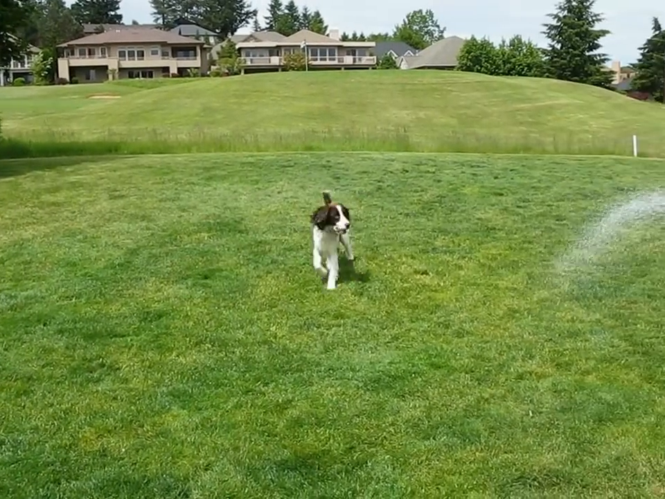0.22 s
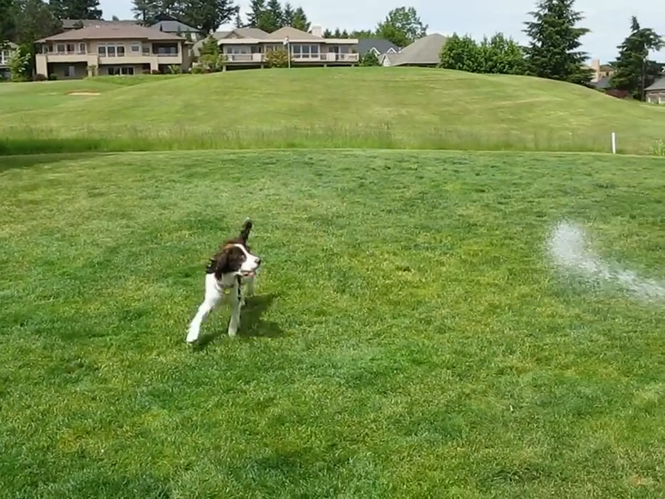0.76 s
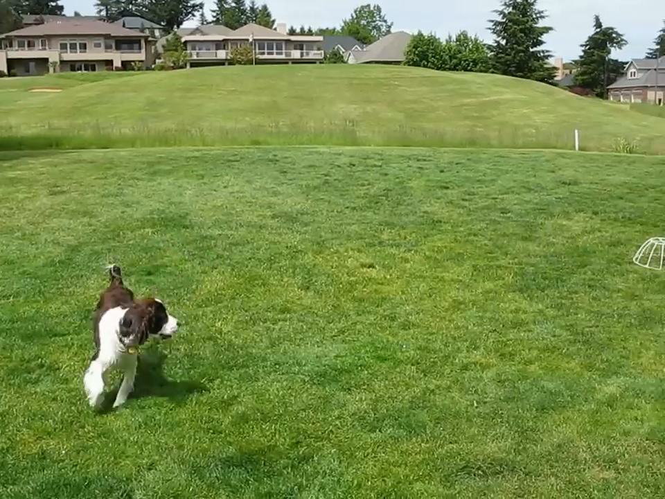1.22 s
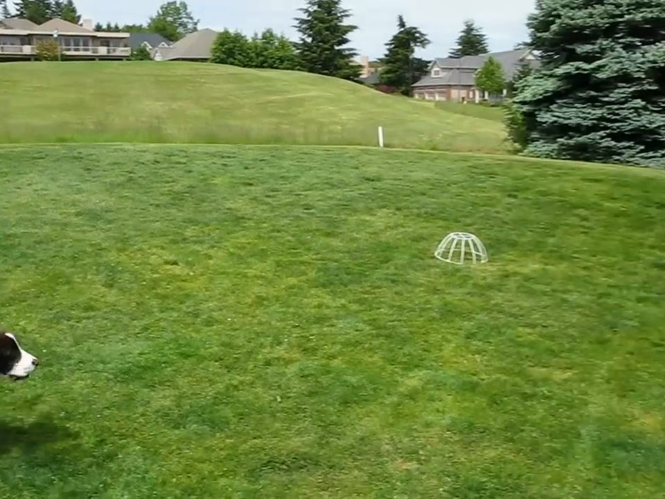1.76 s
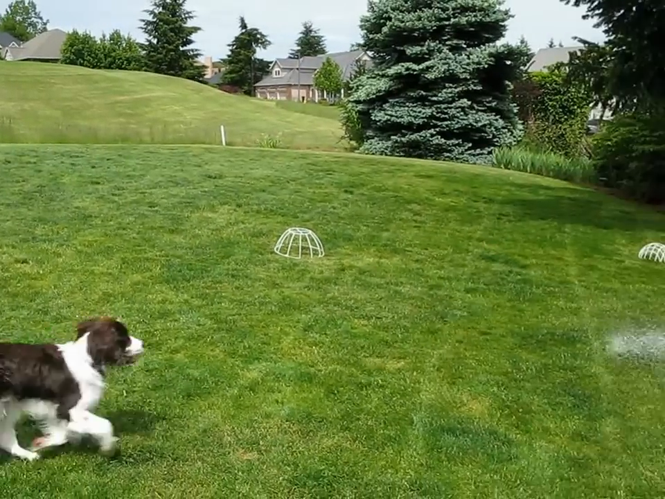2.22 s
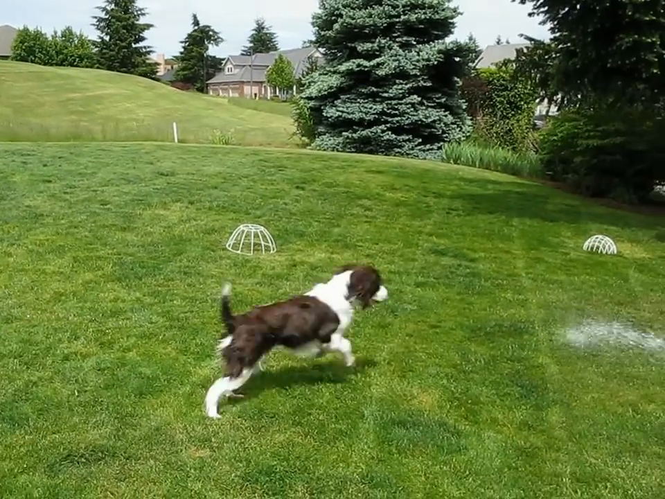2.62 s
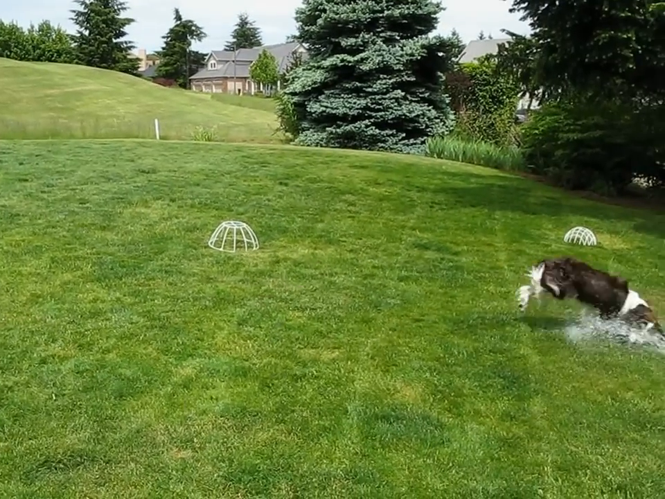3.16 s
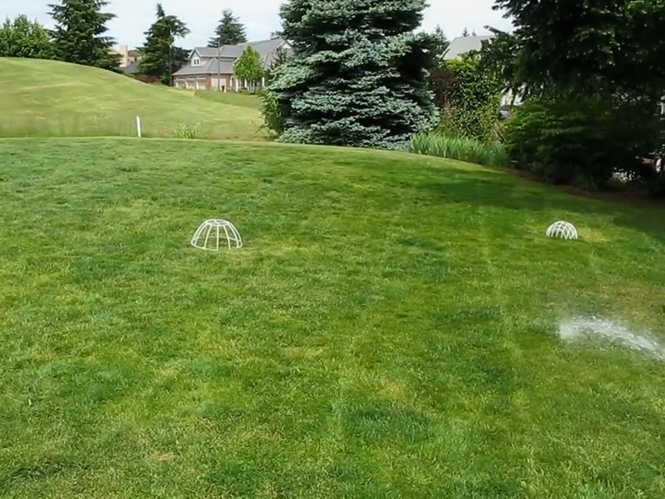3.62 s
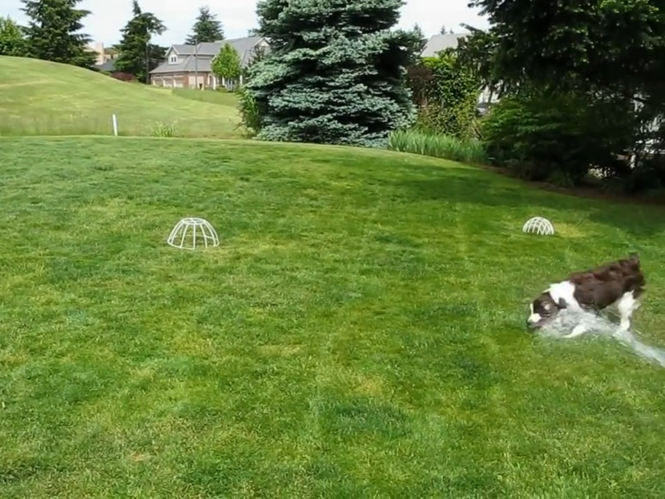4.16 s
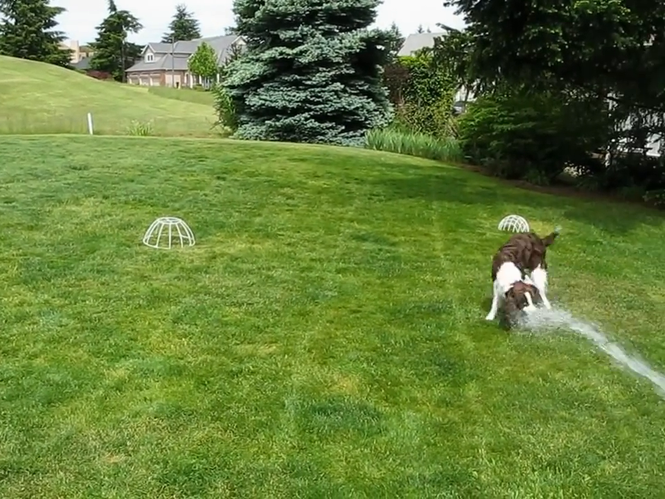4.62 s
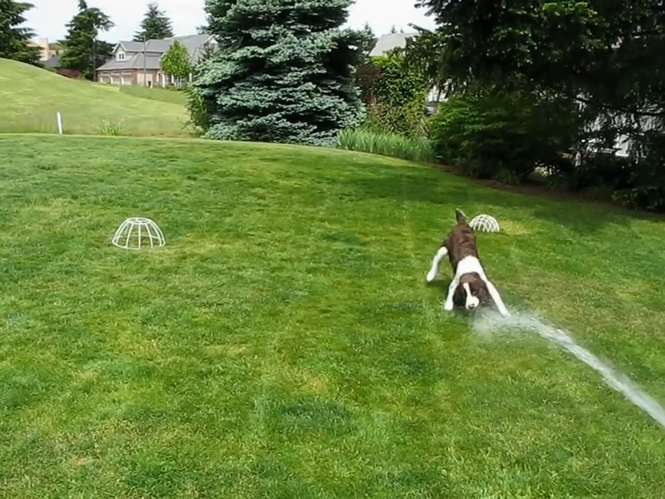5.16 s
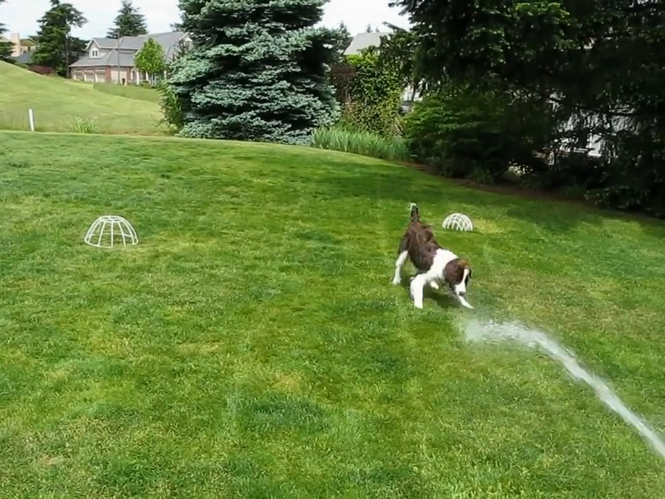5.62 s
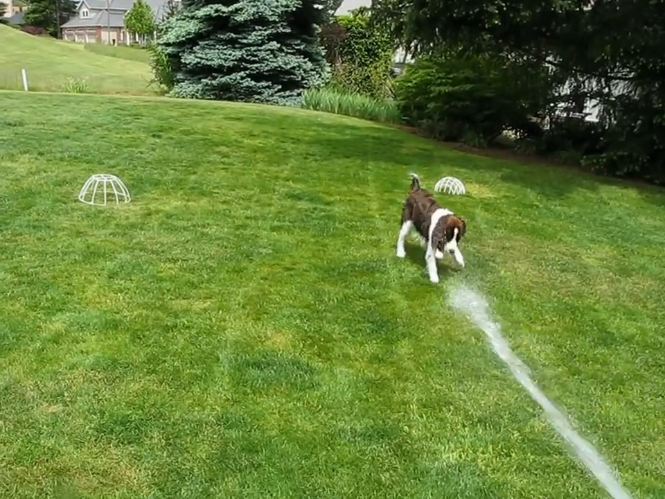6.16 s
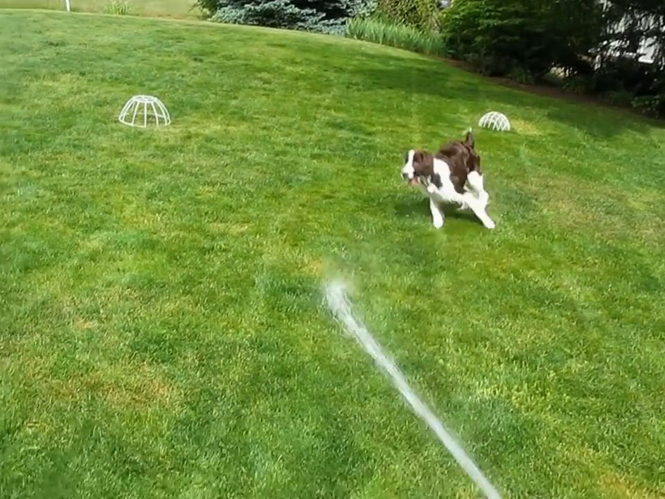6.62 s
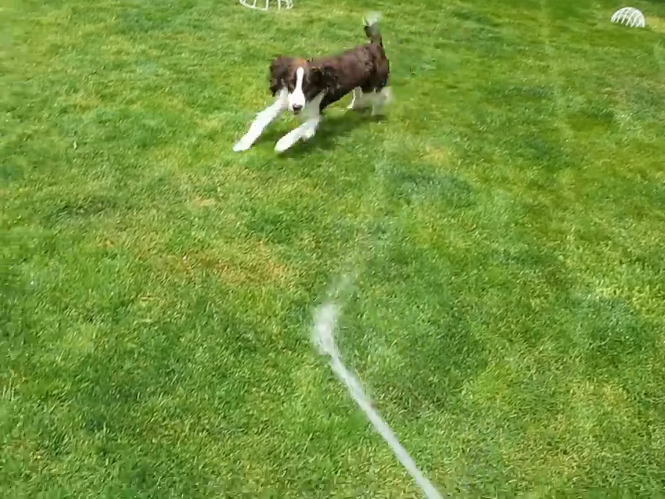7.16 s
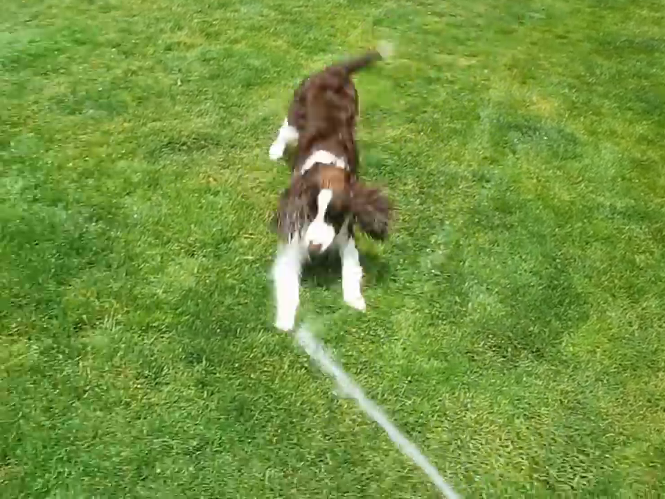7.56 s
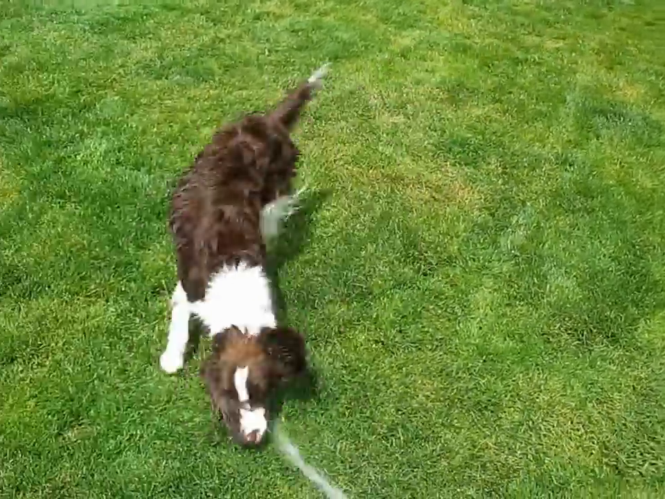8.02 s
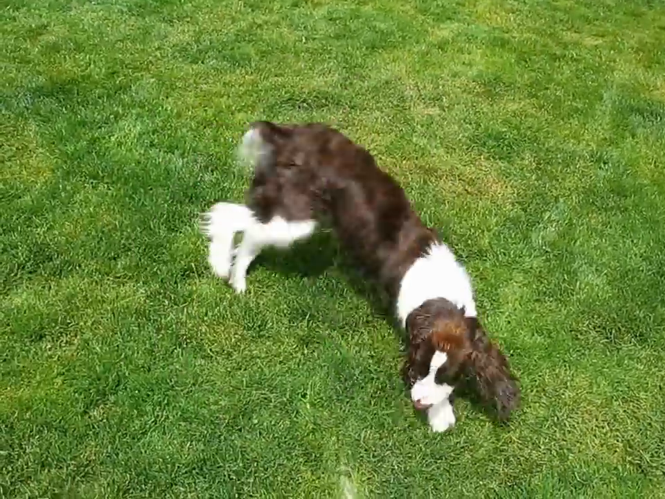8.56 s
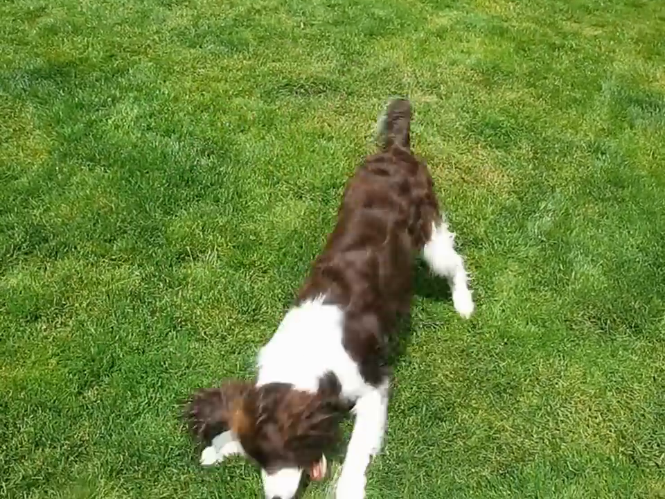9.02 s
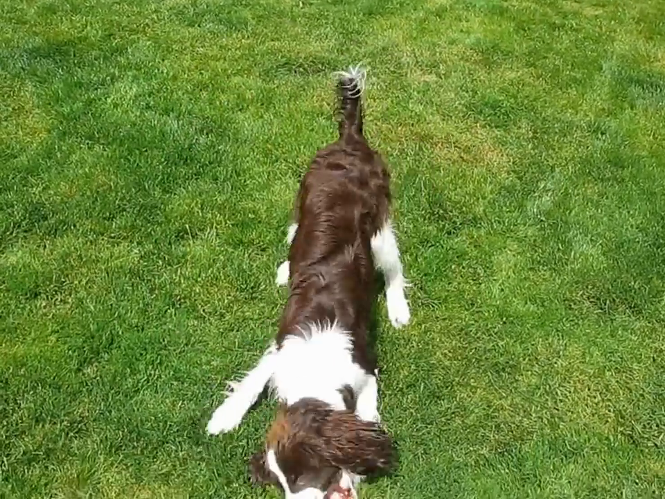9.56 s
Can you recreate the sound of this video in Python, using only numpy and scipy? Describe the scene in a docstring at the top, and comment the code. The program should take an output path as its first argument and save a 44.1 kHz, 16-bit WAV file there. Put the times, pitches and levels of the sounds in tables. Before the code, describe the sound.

Outdoors in a garden, a hose jet hisses close to the microphone, its colour shifting as the nozzle swings round. Spent water patters softly on grass over faint neighbourhood air and a distant engine hum. After about seven seconds the stream hits a dog: the smooth hiss gives way to crackling splatter, fat drops, wet slaps and mouthy gurgles until the end.

```python
"""A garden hose jet hisses over a lawn, close to the microphone, while a dog chases the spray.
The hiss is droplet patter, recoloured as the nozzle comes round from the side towards straight ahead.
Near the end the jet splatters on the dog's muzzle in clumps of drops and gurgles through mouth resonances.
Spent water patters softly on the grass; far off an engine hums in three wavering sine lines.
Low neighbourhood air and a light breeze on the microphone are shaped noise."""
import sys
import numpy as np
from scipy import signal
from scipy.fft import rfft, irfft, next_fast_len
from scipy.io import wavfile
from scipy.ndimage import uniform_filter1d, map_coordinates

SR = 44100
rng = np.random.default_rng(int(sys.argv[2]) if len(sys.argv) > 2 else 0)


def put_to_file(sound):
    """Save the sound as 16-bit audio at rate SR, in the file named by the first command-line argument."""
    columns = np.atleast_2d(sound).T  # one column per channel
    safe = np.clip(columns, -1, 1)
    whole_steps = np.round(safe * 32767)
    wavfile.write(sys.argv[1], SR, whole_steps.astype(np.int16))


N = 432180  # samples, 9.8 s


def amp(db):
    """Decibels to a linear gain."""
    return 10 ** (np.asarray(db) / 20)


def unit(x):
    """x at rms 1."""
    return x / np.sqrt(np.mean(x ** 2) + 1e-20)


def along(points, hz):
    """Interpolate (frequency [Hz], value) points on a log frequency axis."""
    f, v = np.transpose(points)
    return np.interp(np.log(hz + 1), np.log(f + 1), v)


def curve(rows, t):
    """Interpolate (time [s], value) rows at times t."""
    times, values = np.transpose(rows)
    return np.interp(t, times, values)


def wobble(rate):
    """A smooth random curve, rate knots a second."""
    knots = rng.standard_normal(int(N * rate / SR) + 4)
    return map_coordinates(knots, [np.arange(N) * rate / SR])


def swell(t, middle, length):
    """A rounded hump of height 1, at half height over the given length."""
    return .5 ** (np.abs(2 * (t - middle) / length) ** 3)


def swelling(rest_db, rows):
    """A gain that rests at one level and rises in (middle [s], length [s], level [dB]) swells."""
    t = np.arange(N) / SR
    power = sum((amp(db) * swell(t, middle, length)) ** 2 for middle, length, db in rows)
    return np.sqrt(amp(rest_db) ** 2 + power)


def filtered(x, response):
    """x times a complex response of frequency."""
    m = next_fast_len(N + SR // 2)
    return irfft(rfft(x, m) * response(np.fft.rfftfreq(m, 1 / SR)), m)[:N]


def coloured(x, spectrum):
    """x shaped by (frequency [Hz], relative level [dB]) points, at rms 1."""
    return unit(filtered(x, lambda hz: amp(along(spectrum, hz))))


def resonant(x, modes):
    """x through (frequency [Hz], width [Hz], relative level [dB]) resonances of alternating sign, at rms 1."""
    def response(f):
        total = 0
        for k, (centre, width, db) in enumerate(modes):
            damping = 1j * f * width
            total = total + (-1) ** k * amp(db) * damping / (centre * centre - f * f + damping)
        return total
    return unit(filtered(x, response))


def bell(hz, centre_hz, width):
    """A smooth bump of height 1."""
    return 1 / (1 + .5 * ((hz - centre_hz) / width) ** 2) ** 2


def patter(rate, spread_db, share):
    """Droplet impacts of scattered size, carrying a share of the power, on smooth noise."""
    landing = rng.random(N) < rate / SR
    size = amp(spread_db * np.clip(rng.standard_normal(N), -2, 2))
    hits = landing * rng.choice([-1, 1], N) * size
    share = np.clip(share, 0, 1)
    return np.sqrt(share) * unit(hits) + np.sqrt(1 - share) * rng.standard_normal(N)


def bubbles(rate, pitch_hz, spread, cycles):
    """Small air pockets ring briefly with rising pitch, at rms 1 overall."""
    count = int(rate * N / SR)
    start = rng.integers(0, N, count)[:, None]
    pitch, size = rng.standard_normal((2, count, 1))
    n = np.arange(SR // 60)
    turns = pitch_hz * np.exp(spread * pitch) * n / SR
    decay = amp(4 * np.clip(size, -2, 2) - 60 * turns / cycles)
    ring = decay * np.sin(2 * np.pi * turns * (1 + .1 * turns / cycles))
    return unit(np.bincount((start + n).ravel(), ring.ravel(), N)[:N])


def patches(shape, size):
    """A random time-frequency field of rms 1, smooth over size = (bins, frames)."""
    field = rng.standard_normal(shape)
    for axis in (0, 1, 0, 1):
        field = uniform_filter1d(field, size[axis], axis)
    return unit(field)


# low air of the neighbourhood: (frequency [Hz], relative level [dB])
AIR_SPECTRUM = [(20, -14), (40, -11), (55, -1), (68, -4), (110, -2), (170, -3), (300, -9), (500, -18),
                (1500, -40), (8000, -90)]
# far engine: (line [Hz], resting level before its flutter [dB])
ENGINE_LINES = [(97.2, -57), (128.5, -57), (243, -60)]
# one line of the hum swells and fades: (middle [s], length [s], line [Hz], level before flutter [dB])
ENGINE_SWELLS = [(0.035, 1.07, 128.5, -53), (.85, 0.72, 243, -47), (2.3, 1.6, 97.2, -51),
                 (2.9, 0.99, 128.5, -51.5), (3.85, 0.32, 243, -52), (5, .5, 97.2, -52),
                 (5.5, .7, 128.5, -57), (6.7, 1.1, 128.5, -51.5), (6.702, 1, 97.2, -60)]
AIR_DB, AIR_DB_PER_S = -51, -0.48  # level at the start, slow change
BREEZE_DB, PUFF_S, PUFF_LENGTH_S, PUFF_DB = -68, 1.76, .17, -49  # steady level; one puff: middle, length, level
LULL_S, LULL_LENGTH_S = 8.63, 1.1  # everything in the background sinks once: middle, length
LULL_DB, AIR_LULL_DB = -12, -0.5  # change of hum and breeze, change of the air


def outdoors():
    """Low neighbourhood air, a far engine's wavering lines and breeze on the microphone."""
    t = np.arange(N) / SR
    lull = swell(t, LULL_S, LULL_LENGTH_S)
    air_db = AIR_DB + AIR_DB_PER_S * t + AIR_LULL_DB * lull
    air = amp(air_db) * coloured(rng.standard_normal(N), AIR_SPECTRUM)
    gust = swelling(BREEZE_DB, [(PUFF_S, PUFF_LENGTH_S, PUFF_DB)])
    breeze_spectrum = [(15, -8), (35, 0), (70, -6), (200, -30), (800, -90)]
    breeze = gust * coloured(rng.standard_normal(N), breeze_spectrum)
    engine = 0
    for hz, rest_db in ENGINE_LINES:
        own_swells = [(middle, length, db) for middle, length, line_hz, db in ENGINE_SWELLS
                      if abs(line_hz / hz - 1) < .12]
        phase = 2 * np.pi * np.cumsum(hz + 1.7 * wobble(9)) / SR
        flutter = amp(1.3 * wobble(3.09))
        engine = engine + swelling(rest_db, own_swells) * flutter * np.sin(phase)
    return air + amp(LULL_DB * lull) * (engine + breeze)


# the soft turf: (frequency [Hz], relative level [dB])
TURF_SPECTRUM = [(60, -30), (170, -4), (310, -1), (450, -5), (760, 0), (1050, -6), (1400, -5), (2500, -18),
                 (6000, -50), (16000, -90)]
# where the nozzle points, also for the jet: (time [s], aim [0 = off to the side, 1 = straight ahead])
NOZZLE_AIM = [(0, 0), (.75, 0.09), (2.3, 0.38), (4.6, 0.54), (6.1, 0.83), (8, 0.81)]
# water that hits the dog, also for the splash and the jet: (time [s], share [0-1])
DOG_CONTACT = [(7.1, 0.02), (7.55, 0.29), (7.85, 0.85), (8.03, .55), (8.12, 0.93), (9.8, 0.95)]
LAWN_DB, LAWN_AHEAD_DB = -42.5, -7  # level with none on the dog: aimed aside, change when aimed ahead


def lawn():
    """Spent water lands softly on the grass; the share that hits the dog never gets there."""
    t = np.arange(N) / SR
    reaching = np.sqrt(np.clip(1 - curve(DOG_CONTACT, t), 0, 1))
    level = amp(LAWN_DB + LAWN_AHEAD_DB * curve(NOZZLE_AIM, t))
    return reaching * level * coloured(patter(rate=900, spread_db=1, share=0.21), TURF_SPECTRUM)


# single fat drops: (time [s], relative level of tick and ring [dB], level of the duller, longer slap [dB])
FAT_DROPS = [(1.927, -8, -48), (7.2565, 1, -38), (7.333, -9, -26), (7.4898, 5, -30), (7.6194, 1, -24),
             (7.665, -6, -22), (7.729, -1, -24), (7.7744, 0, -31), (7.8694, 0, -30), (8.054, -1, -30),
             (8.165, 5, -35), (8.184, -1, -35), (8.2633, -10, -29), (8.459, 2, -27), (8.4904, 0, -22),
             (8.766, 6, -37), (8.9072, 3, -36), (8.975, 0, -32), (9.0677, 1, -39), (9.1296, 1, -31),
             (9.2327, 6, -48), (9.2445, 0, -50), (9.2847, -3, -46), (9.296, 5, -52), (9.4038, 6.5, -38)]
DROP_HZ, DROP_SPREAD = 3550, .06  # ring pitch and its log scatter


def fat_drops():
    """Each fat drop is a tick, a very short ring and a duller, longer slap, with no bass."""
    out, t = np.zeros(N + SR), np.arange(SR // 20) / SR
    slap_band = signal.butter(2, [750, 3200], "band", fs=SR, output="sos")
    no_bass = signal.butter(3, 500, "high", fs=SR, output="sos")
    for s, db, slap_db in FAT_DROPS:
        hz = DROP_HZ * np.exp(DROP_SPREAD * rng.standard_normal())
        # each part falls 60 dB in the seconds given
        tick = 0.25 * rng.standard_normal(len(t)) * amp(-60 * t / 0.0059)
        ring = 0.37 * np.sin(2 * np.pi * hz * t) * amp(-60 * t / 0.005)
        slap = unit(signal.sosfilt(slap_band, rng.standard_normal(len(t)))) * amp(-60 * t / 0.035)
        out[round(s * SR):][:len(t)] += amp(db - 6.5) * (tick + ring) + amp(slap_db) * slap
    return signal.sosfilt(no_bass, out[:N])


# wet gurgling bursts as the dog meets the jet, first a paw splash, then bites:
# (start [s], length [s], gurgle added to the resting gurgle [dB])
GURGLE_BURSTS = [(7.467, 0.05, -32), (7.607, 0.0052, -25.5), (7.649, 0.12, -37.5), (7.84, .02, -32),
                 (7.986, 0.085, -35), (8.13, 0.066, -36), (8.24, 0.15, -35.5), (8.378, 0.17, -33.5),
                 (8.56, 0.53, -37), (8.891, 0.077, -36), (9.085, 0.11, -32), (9.315, 0.13, -37.5),
                 (9.47, 0.31, -33)]
GURGLE_DB = -38  # resting gurgle between bursts, in full contact
ATTACK_S, RELEASE_S = .012, 0.017  # of each burst


def burst_lift(t):
    """dB by which the bursts lift the gurgle: each rises fast, holds and falls."""
    gain = 0
    for start, length, db in GURGLE_BURSTS:
        end = start + length
        corners = [start - ATTACK_S / 2, start + ATTACK_S / 2, end, end + RELEASE_S]
        gain = gain + amp(db - GURGLE_DB) * np.interp(t, corners, [0, 1, 1, 0])
    return 10 * np.log10(1 + gain ** 2)


# water bursting on fur: (frequency [Hz], relative level [dB])
FUR_SPECTRUM = [(300, -60), (1200, -30), (1900, -12.5), (2700, -4), (3150, -5), (3600, 2), (4300, -1),
                (4900, -4), (5900, -.3), (8400, -.8), (9500, -3.5), (10500, .5), (13100, -2),
                (13950, -12.5), (14600, -7.5)]
# resonances of the open mouth: (frequency [Hz], width [Hz], relative level [dB])
MOUTH_MODES = [(364, 140, -51), (776, 220, 3), (1162, 330, 4), (1450, 315, 8), (2140, 420, 0)]
# the muzzle slips out of the jet: (middle [s], length [s], dip [dB])
MUZZLE_MISSES = [(7.83, .09, 1.5), (8.11, .04, 2.5), (8.215, .05, 3), (9.2, .025, 2.5), (9.27, .045, 4.5),
                 (9.315, .035, 3.5)]
# water reaches deep into the mouth: (middle [s], length [s], level in full contact [dB])
DEEP_FILLS = [(8.052, .06, -39), (9.55, 0.18, -41), (9.7, 0.14, -33)]
FIZZ_DB, SLAP_DB, THROAT_DB = -22, -31, -45  # full contact, between bursts and fills
FIZZ_FOLLOWS, SLAP_FOLLOWS = .12, 0.29  # dB gained per dB of gurgle
MISS_GURGLE = 2  # the gurgle dips this many times as deep


def splash():
    """Water bursts on the dog in clumps of drops and rings in the open mouth."""
    t = np.arange(N) / SR
    lift_db = burst_lift(t)
    miss_db = sum(db * swell(t, middle, length) for middle, length, db in MUZZLE_MISSES)
    contact = np.sqrt(np.clip(curve(DOG_CONTACT, t), 0, 1))
    clumps = amp(1.5 * wobble(220) + .6 * wobble(45))
    drops = clumps * patter(rate=1700, spread_db=5, share=.6)
    fizz = amp(FIZZ_DB + FIZZ_FOLLOWS * lift_db - miss_db) * coloured(drops, FUR_SPECTRUM)
    # the heavier the gurgle, the harder the slap on lips and tongue
    sparkle = bubbles(rate=430, pitch_hz=2970, spread=0.23, cycles=5.2)
    lips = resonant(drops + .5 * sparkle, [(2670, 450, -4.0), (3690, 350, 10.5)])
    slap = amp(SLAP_DB + SLAP_FOLLOWS * lift_db - miss_db) * lips
    pockets = bubbles(rate=110, pitch_hz=1310, spread=0.52, cycles=14.0)
    gurgle_db = GURGLE_DB + lift_db - MISS_GURGLE * miss_db
    gurgle = amp(gurgle_db) * resonant(drops + 0.21 * pockets, MOUTH_MODES)
    throat_drops = patter(rate=150, spread_db=2.0, share=0.57)
    throat = resonant(throat_drops, [(329, 79, -2.2), (784, 220, -1.5)])
    deep = swelling(THROAT_DB, DEEP_FILLS) * throat
    return contact * (fizz + slap + gurgle + deep)


# colour of the jet turned away: (frequency [Hz], change [dB])
AWAY_COLOUR = [(400, 6), (750, -5.5), (1900, 1.5), (2800, -4.5), (4800, -1.5), (6600, -6), (7500, -6.5),
               (9500, 3), (14300, 0), (15300, 4)]
# interference nulls that hold while the hand keeps one pose: (start [s], end [s], frequency at start [Hz],
# frequency at end [Hz], width [Hz], depth [dB], rise when swung away [Hz])
POSE_NULLS = [(-.3, 2, 5710, 5620, 150, 13, 30), (2, 4.3, 5560, 5450, 170, 9, 0),
              (2.1, 4.4, 6300, 6150, 150, 4.5, 0), (4.4, 6.2, 5980, 5900, 160, 8.5, 0),
              (4.4, 6.2, 4230, 4290, 180, 6, 0), (6.2, 7.2, 4560, 4470, 190, 13, 0),
              (7.2, 8, 4480, 4520, 180, 8, 0), (6.1, 7.05, 2300, 2300, 280, 3.5, 0),
              (-.3, 2, 7600, 7400, 200, 4, 0), (2.2, 6.2, 9100, 8950, 240, 3.5, 0),
              (-.3, 1.9, 10380, 10400, 330, 8.5, 100), (2, 7.5, 10200, 9950, 300, 3, 0),
              (-.3, 4.4, 11800, 11600, 470, 7.5, 1150), (4.4, 6.1, 11500, 11400, 470, 3.5, 0),
              (-.3, 1.7, 13900, 14000, 330, 5, 400)]
POSE_S = 0.14  # time the hand takes to change pose
PEAK_HZ, PEAK_AHEAD_HZ, PEAK_SWING_HZ = 4360, 940, 300  # a bright band: aside, rise ahead, rise swung away
PEAK_DB, PEAK_AHEAD_DB, PEAK_SWING_DB = 3.5, -3, 4.5  # its height: aside, change ahead, change swung away
PEAK_WIDTH_HZ = 315
HAND_MS, HAND_AHEAD_MS = 1.04, -0.582  # echo off the hand: delay aside, change ahead
HAND_ECHO = 0.11  # echo strength straight ahead


def aim_colour(hz, t, aim, swing):
    """dB of the peak, nulls and hand echo that slide through the hiss as the nozzle is aimed."""
    peak_hz = PEAK_HZ + PEAK_AHEAD_HZ * aim + PEAK_SWING_HZ * swing
    peak_db = PEAK_DB + PEAK_AHEAD_DB * aim + PEAK_SWING_DB * swing
    db = swing * along(AWAY_COLOUR, hz) + peak_db * bell(hz, peak_hz, PEAK_WIDTH_HZ)
    for start, end, start_hz, end_hz, width, depth_db, rise_hz in POSE_NULLS:
        held = np.clip(.5 + np.minimum(t - start, end - t) / POSE_S, 0, 1)
        null_hz = np.interp(t, [start, end], [start_hz, end_hz]) + rise_hz * swing
        db = db - depth_db * held * bell(hz, null_hz, width)
    delay_s = (HAND_MS + HAND_AHEAD_MS * aim) / 1000
    comb = 1 + HAND_ECHO * aim * np.cos(2 * np.pi * hz * delay_s)
    return db + 20 * np.log10(np.abs(comb))


# basic colour of the hiss: (frequency [Hz], relative level [dB])
HISS_SPECTRUM = [(120, -49), (430, -30), (800, -22.5), (1600, -19.5), (2200, -14.5), (2650, -11.5),
                 (3200, -8.5), (4100, -3), (5000, -2), (6000, -6), (7300, -6.5), (9000, -11.5),
                 (12000, -14), (14800, -14)]
SWING_S, SWING_LENGTH_S = 1.38, 0.82  # the jet is swung away and back once: middle, length
HISS_DB, HISS_AHEAD_DB = -20.5, -1.37  # unblocked, 3.5-8 kHz: aimed aside, change when aimed ahead
HISS_BLOCKED_DB = 1  # lift of what still flies free, as the dog cuts the stream short
MIST_DB, MIST_AHEAD_DB, MIST_SWING_DB = -32.5, 4, -2.5  # fine mist, 9-15.5 kHz: aside, change ahead, swung away


def jet():
    """The stream tears into droplets whose dense patter is the hiss."""
    spray = patter(rate=3400, spread_db=4.5, share=.35)
    spray = unit(spray * amp(.6 * wobble(190) + .15 * wobble(35)))
    hz, t, z = signal.stft(spray, SR, nperseg=512)
    hz = hz[:, None]
    # each size of droplet comes in its own little bursts
    z = z * amp(1.3 * patches(z.shape, size=(14, 1)))
    # the small cavity at the microphone has its own fixed colour
    cavity_db = 3 * bell(hz, 6610, 710) + 3 * bell(hz, 750, 110) + 2 * bell(hz, 2700, 170)
    aim, swing = curve(NOZZLE_AIM, t), swell(t, SWING_S, SWING_LENGTH_S)
    gain = amp(along(HISS_SPECTRUM, hz) + cavity_db + aim_colour(hz, t, aim, swing))

    def band_rms(band):
        return np.sqrt(np.mean(gain ** 2 * band, axis=0))

    blocked = np.clip(curve(DOG_CONTACT, t), 0, 1)
    hiss_db = HISS_DB + HISS_AHEAD_DB * aim + HISS_BLOCKED_DB * blocked
    mist_db = MIST_DB + MIST_AHEAD_DB * aim + MIST_SWING_DB * swing
    # hiss and mist each keep their own level, whatever the colour does
    hiss = amp(hiss_db) / band_rms((hz > 3500) & (hz < 8000))
    mist = amp(mist_db) / band_rms((hz > 9000) & (hz < 15500))
    fine = along([(7500, 0), (9500, 1)], hz)  # crossover from hiss to mist
    free = np.sqrt(1 - blocked)
    z = z * gain * free * (hiss * (1 - fine) + mist * fine)
    return signal.istft(z, SR, nperseg=512)[1][:N]


def scene():
    """Garden, dog and hose at one microphone."""
    return (outdoors() + lawn() + fat_drops() + splash() + jet())[None]


TOP_HZ = 15780  # nothing passes above


def record(dry):
    """The microphone's treble droops and ends at its band limit."""
    droop = [(14900, 0.5), (15750, -7)]  # (frequency [Hz], gain [dB])
    return filtered(dry[0], lambda hz: amp(along(droop, hz)) * (hz < TOP_HZ))[None]


dry = scene()
out = record(dry)
put_to_file(out)
```